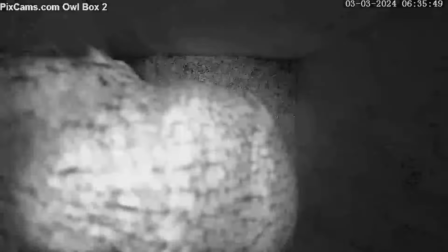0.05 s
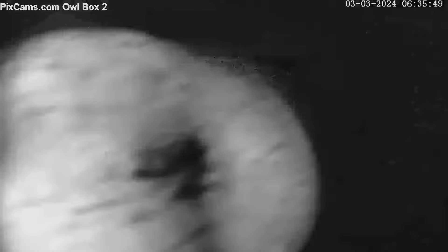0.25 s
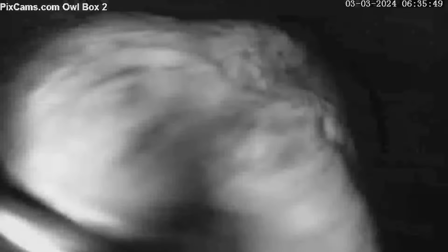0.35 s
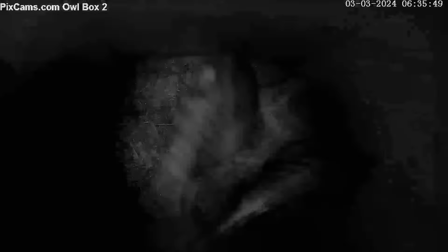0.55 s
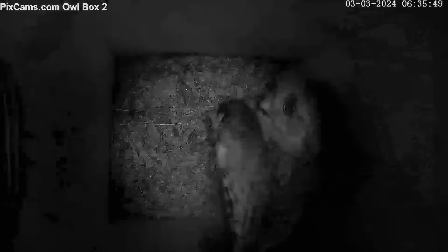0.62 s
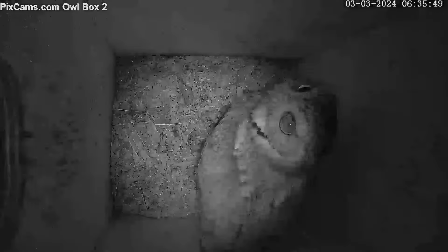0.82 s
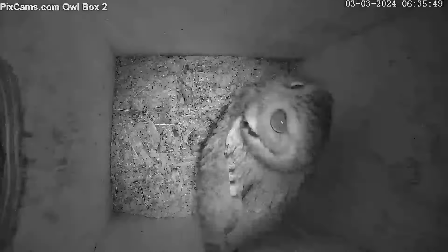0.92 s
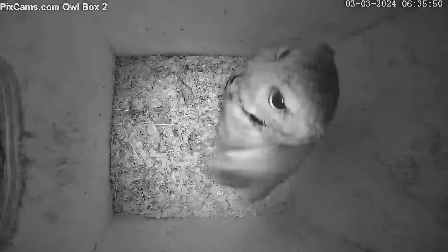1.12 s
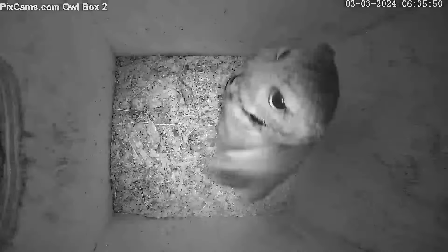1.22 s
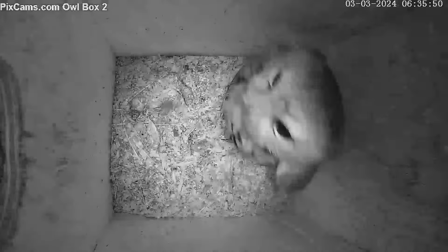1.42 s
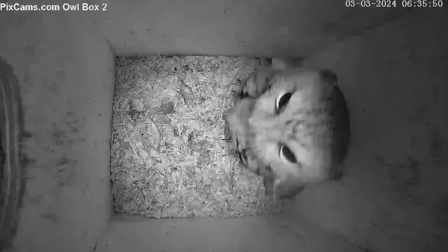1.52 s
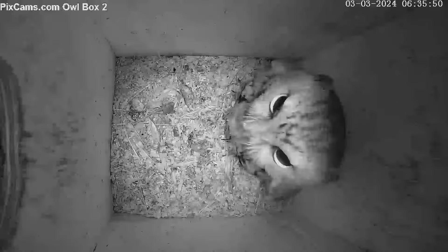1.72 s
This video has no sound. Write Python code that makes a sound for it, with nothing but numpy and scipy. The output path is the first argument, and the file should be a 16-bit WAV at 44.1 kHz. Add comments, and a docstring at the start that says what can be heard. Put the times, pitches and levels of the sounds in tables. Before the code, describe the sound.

An owl lands in a small wooden nest box with loud hollow thumps, claw knocks and scraping, then shuffles softly on shavings and makes a weaker flurry, heard close through a dull, narrow-band microphone with faint hiss.

```python
"""An owl drops into a wooden nest box, heard by a narrow-band camera microphone inside, over steady hiss.
First a very faint thump, then to about 0.65 s body thumps, claw strikes and raking: bursts of force on box modes.
Next, quiet shuffling on wood shavings: random slips drive the modes, dry grains rustle.
From about 1.1 s a weaker flurry of blows and slides as it turns, dying away by 1.6 s."""
import sys
import numpy as np
from scipy import signal
from scipy.fft import rfft, irfft
from scipy.io import wavfile

SR = 44100
rng = np.random.default_rng(int(sys.argv[2]) if len(sys.argv) > 2 else 0)


def put_to_file(sound):
    """Save the sound as 16-bit audio at rate SR, in the file named by the first command-line argument."""
    columns = np.atleast_2d(sound).T  # one column per channel
    safe = np.clip(columns, -1, 1)
    whole_steps = np.round(safe * 32767)
    wavfile.write(sys.argv[1], SR, whole_steps.astype(np.int16))


def voltage_ratio(decibels):
    """Convert decibels (scalar or array-like) to amplitude ratios, 20 dB per decade."""
    exponent = np.asarray(decibels, float) / 20
    return 10 ** exponent


N = 77175

# panel and air modes of the box: f/Hz, relative level/dB, t60/s (raised to 0.01 s if shorter)
BOX_MODES = [(80.2, -7.5, 0.2), (98.5, -12.5, 0.45), (124, 3, 0.11), (154.1, -2, 0.11), (206.25, 1, 0.24),
             (267.2, 3.5, 0.046), (322.5, -3, 0.049), (397.6, 0, 0.097), (450, -7, 0.11), (558, -14, 0.027),
             (723.4, -3.5, 0.084), (783, 1.5, .06), (1213, -11, 0.052), (1531.4, -5, 0.012),
             (1671, -12.5, 0.042), (1832, -8.5, 0.021), (2540, -9.5, 0.016), (3115, -13, 0.015),
             (3550, -13, 0.0067)]
SWELL_CYCLES = 0.6  # time constant of each mode's swell

# circuit hiss spectrum: f/Hz, relative density/dB
HISS_COLOUR = [(24, -36), (40, -1.5), (547, -6.5), (616, -5), (895, -9), (1650, -9), (2910, -11),
               (3480, -4), (4400, -20), (5720, -84), (9680, -120)]
HISS_RMS_DB = -67.5  # ahead of the band limit

# weight shifting on the floor board: t/s, force level/dB
LEAN = [(.18, -60.5), (.21, -19), (.3, -29), (0.401, -14), (0.502, -7), (.61, -47.5), (.67, -24.5),
        (.74, -27.5), (.79, -32), (.9, -44), (0.979, -48.5), (1.101, -27.5), (1.161, -32), (1.3, -39),
        (1.47, -44.5), (1.5, -68)]
LEAN_HZ, LEAN_OCTAVES = 107, 0.66

# feathers and shavings rustling: t/s, dry level/dB
RUSTLE = [(.2, -74), (0.237, -57), (.248, -41.5), (0.273, -50), (.3, -37), (0.362, -36.5), (0.388, -30),
          (0.426, -31.5), (0.427, -44.5), (0.438, -27), (.465, -21), (.5, -36), (0.521, -49.5), (.53, -34),
          (.57, -46.5), (.6, -57.5), (0.638, -52), (0.738, -65), (.79, -52), (0.851, -48.5), (.9, -54),
          (.965, -60), (.99, -56), (1.04, -55.5), (1.106, -39.5), (1.152, -48.5), (1.187, -62.5),
          (1.226, -56.5), (1.28, -61.5), (1.31, -53.5), (1.37, -66.5), (1.41, -56.5), (1.48, -70.5),
          (1.53, -63), (1.6, -86)]
# gentle contact spectrum: f/Hz, relative density/dB
GENTLE_COLOUR = [(500, -44.5), (900, -21), (1150, -12), (1400, -20), (2000, -8.5), (2560, -9), (3000, -12),
                 (3500, -17), (4000, -23.5), (6000, -42)]
# hard contact (scrape) spectrum: f/Hz, relative density/dB
SCRAPE_COLOUR = [(400, -32), (800, -6), (1500, -3), (2300, -6.5), (3000, -8.5), (3700, -8), (4400, -9),
                 (6000, -30)]
GRAINS_PER_S, GRAIN_SPREAD_DB, RUSTLE_RING_DB = 10000, 4.5, 1
HARD_FROM_DB, HARD_SPAN_DB = -48.5, 14  # rustle level at which scrape sets in; range of the crossfade

# body pressing and sliding on the boards: t/s, force level/dB, centre f/Hz, breadth/octaves (0.1 at least)
SLIDE = [(.17, -51, 420, 0.15), (.2, -22, 416.4, 0.33), (.235, -16.5, 250, .8), (.27, 1.5, 160, .8),
         (.36, -9, 300, 0.92), (0.411, 0.5, 300, .9), (0.451, -8.5, 200, 1.12), (.49, -14, 200, 1.5),
         (.51, -30, 153, 1.6), (0.569, -23.5, 171, 0.75), (.6, -18.5, 123, .7), (0.702, -31, 304, 0.87),
         (0.779, -40.5, 302, 0.68), (0.824, -16.5, 430, 0.1), (.87, -36, 430, 0.46),
         (0.919, -23.5, 410, 0.067), (.97, -40.5, 400, 0.18), (1.038, -20, 398, .2), (1.07, -32, 450, 1.1),
         (1.11, -18.5, 750, 0.5), (1.149, -35, 715, .6), (1.19, -25.5, 192, 0.86), (1.25, -21.5, 250, 1.43),
         (1.29, -24, 203, 0.88), (1.348, -26.5, 400, 1.62), (1.371, -38.5, 212.4, 1.6),
         (1.421, -21.5, 225.3, 1.13), (1.455, -40, 166.7, 2.2), (1.483, -32.5, 150, 0.58),
         (1.53, -41, 790, 0.1), (1.566, -46.5, 790, 0.41), (1.6, -75.5, 790, 0.17)]
SLIPS_PER_S, SLIP_SPREAD_DB = 3000, 2

# claws striking and raking the wood: t/s, peak level/dB, centre f/Hz, length/s, breadth/octaves (0.1 at least)
CLAWS = [(0.219, -21.5, 913, 0.0099, 0.53), (0.257, -27, 1600, 0.0097, .4),
         (.279, -17, 1595, 0.0034, 0.096), (0.299, -4.5, 1410, 0.0037, .5), (0.324, -3, 1100, .005, .9),
         (0.33, -8, 1500, .007, 0.89), (0.372, -17.5, 1318, 0.0024, .6), (0.397, -10.5, 2300, .005, .6),
         (.407, -3, 2000, .01, 0.88), (0.421, -22, 1485, 0.0065, 1.2), (0.43, -17, 1500, 0.021, 3.6),
         (0.509, -18, 2950, 0.0087, 1), (.525, -13, 1210, 0.012, .9), (0.544, -3.5, 1190, .006, .35),
         (0.544, -9, 3320, .005, 0.34), (0.56, -16.5, 872, 0.0077, 1.4), (0.618, -23.5, 1200, 0.0055, 0.76),
         (.63, -20, 1200, 0.0049, 1.3), (1.094, -58, 735, .008, 0.17), (1.132, -39, 776, 0.0064, .2),
         (1.215, -32.5, 1200, 0.0096, 1.03), (1.3, -42.5, 2100, 0.0076, .3), (1.4, -45, 2000, 0.018, .3),
         (1.503, -26, 725, .006, 0.33), (1.504, -32.5, 1650, 0.0074, 0.3),
         (1.502, -33.5, 3550, 0.0074, 0.16)]
CLAW_ROUGH, CLAW_DRY_DB, CLAW_DAMPING_DB_PER_S = 0.84, -11, 202

# body blows on the boards: t/s, peak level/dB, centre f/Hz, length/s, damping by the leaning body/(dB/s)
THUMPS = [(0.0, -48, 137.4, 0.0074, 302), (.24, -12.5, 200, 0.0065, 303), (.246, -4, 270, 0.0084, 196.5),
          (.262, -17, 200, 0.013, 190), (.298, -10, 260, .008, 288.5), (.328, -7, 260, .006, 300),
          (.334, -9.5, 260, 0.0078, 190.5), (.423, -15, 200, .006, 599), (.462, -4, 120, 0.0052, 311),
          (.516, -5.5, 160, 0.0027, 499), (.529, -6, 200, 0.0071, 804.5), (.555, -12, 133, 0.0033, 300),
          (.629, -1.5, 239, 0.011, 50.5), (1.197, -26.5, 120, 0.0017, 603.5), (1.221, -22, 220, 0.015, 404),
          (1.243, -20, 132.5, 0.031, 405), (1.264, -33, 250, .006, 602), (1.4, -24, 124, 0.0043, 497),
          (1.412, -27, 250, 0.0025, 502), (1.432, -32.5, 160, 0.03, 898.5),
          (1.518, -45.5, 190, 0.024, 396.5), (1.555, -45, 190, 0.0087, 397)]
THUMP_ROUGH, THUMP_DRY_DB, THUMP_OCTAVES = 0.37, -8.5, 0.63
SPOT_DB = 2.0  # random spread of each mode's level from blow to blow

BASS_CUT_HZ, EDGE_HZ, EDGE_WIDTH_HZ = 80, 3680, 1400
FULL_SCALE = 0.79
DITHER_RMS_DB = -103


def evened(x):
    """Scales x to unit rms."""
    return x / np.sqrt(np.mean(x ** 2) + 1e-20)


def add(mix, start_s, sound):
    """Adds sound into mix at start_s, cut at the end of mix."""
    part = mix[max(round(start_s * SR), 0):][:len(sound)]
    part += sound[:len(part)]


def level_curve_db(time_s, level_db):
    """Level per sample from a table of points, -120 dB outside them."""
    return np.interp(np.arange(N) / SR, time_s, level_db, -120, -120)


def coloured(x, points):
    """Filters x by a spectrum drawn on a log-frequency axis."""
    f, db = np.transpose(points)
    hz = np.fft.rfftfreq(len(x), 1 / SR)
    gain_db = np.interp(np.log(hz + 1), np.log(f + 1), db)
    return irfft(rfft(x) * voltage_ratio(gain_db), len(x))


def clicks(per_s, spread_db):
    """Random clicks of either sign at unit rms overall; a few are large."""
    hit, size, sign = rng.random((N, 3)).T
    height = voltage_ratio(-spread_db * np.log(size + 0.0038))
    return evened((hit < per_s / SR) * height * np.sign(sign - 0.5))


def modes(seconds=0.3):
    """One dying sine per box mode, swelling softly over its first cycle or two."""
    t = np.arange(round(seconds * SR)) / SR
    hz, db, t60_s = np.transpose(BOX_MODES)[:, :, None]
    t60_s = np.maximum(t60_s, 0.01)
    swell = (1 - np.exp(-t * hz / SWELL_CYCLES)) ** 2
    decay = voltage_ratio(db - 60 * t / t60_s)
    return swell * decay * np.sin(2 * np.pi * hz * t) / np.sqrt(t60_s * SR)


def reach(centre_hz, octaves):
    """Gaussian drive of each mode by a contact at centre_hz; octaves is its standard deviation."""
    distance_octaves = np.log2(np.array(BOX_MODES)[:, :1] / centre_hz)
    return np.exp(-0.5 * (distance_octaves / octaves) ** 2)


def hiss():
    """Circuit noise: white noise shaped to the hiss spectrum."""
    return voltage_ratio(HISS_RMS_DB) * evened(coloured(rng.standard_normal(N), HISS_COLOUR))


def lean():
    """Small slips under the feet stir mainly the lowest panels."""
    force = clicks(SLIPS_PER_S, SLIP_SPREAD_DB) * voltage_ratio(level_curve_db(*np.transpose(LEAN)))
    ring = (reach(LEAN_HZ, LEAN_OCTAVES) * modes()).sum(0)
    return signal.fftconvolve(force, ring)[:N]


def rustle():
    """Dense grains, heard dry and through the box; hard contact turns the rustle into a wide scrape."""
    level_db = level_curve_db(*np.transpose(RUSTLE))
    hard = np.clip((level_db - HARD_FROM_DB) / HARD_SPAN_DB, 0, 1)
    grains = clicks(GRAINS_PER_S, GRAIN_SPREAD_DB)
    gentle = evened(coloured(grains, GENTLE_COLOUR))
    scrape = evened(coloured(grains, SCRAPE_COLOUR))
    direct = ((1 - hard) * gentle + hard * scrape) * voltage_ratio(level_db)
    return direct + voltage_ratio(RUSTLE_RING_DB) * signal.fftconvolve(direct, modes().sum(0))[:N]


def slide():
    """Uneven slips of the body; the place of contact wanders, and with it the modes that sound."""
    time_s, level_db, centre_hz, octaves = np.transpose(SLIDE)
    t = np.arange(N) / SR
    centre_hz = np.exp(np.interp(t, time_s, np.log(centre_hz)))
    share = reach(centre_hz, np.maximum(np.interp(t, time_s, octaves), 0.1))
    force = clicks(SLIPS_PER_S, SLIP_SPREAD_DB) * voltage_ratio(level_curve_db(time_s, level_db))
    return signal.fftconvolve(force * share, modes(), axes=1).sum(0)[:N]


def blow(peak_db, centre_hz, length_s, octaves, damping_db_per_s, rough, dry_db):
    """A first hit and a short chatter of force: rings modes near its centre and is also heard dry."""
    ring = modes()
    t = np.arange(ring.shape[1]) / SR
    u = np.arange(2048) / SR / max(length_s, 0.001)
    chatter = rng.standard_normal(2048) * np.sin(np.pi * np.minimum(u, 1) ** 0.67)
    force = rough * chatter / np.sqrt(length_s * SR)
    force[0] += 1 - min(rough, 1)  # the first hit

    spot = voltage_ratio(SPOT_DB * rng.standard_normal((len(BOX_MODES), 1)))
    body = (reach(centre_hz, octaves) * spot * ring).sum(0) * voltage_ratio(-abs(damping_db_per_s) * t)
    edges_hz = centre_hz * 2.0 ** np.array([-octaves, octaves])
    band = signal.butter(3, edges_hz, "band", fs=SR, output="sos")
    direct = signal.sosfilt(band, 1.0 * (t == 0))
    sound = signal.fftconvolve(force, evened(body) + voltage_ratio(dry_db) * evened(direct))
    return voltage_ratio(peak_db) * sound / abs(sound).max()


def claws():
    """Hard claw strikes: mostly chatter, all with the same damping."""
    out = np.zeros(N)
    for start_s, peak_db, hz, length_s, octaves in CLAWS:
        add(out, start_s, blow(peak_db, hz, length_s, max(octaves, 0.1),
                               CLAW_DAMPING_DB_PER_S, CLAW_ROUGH, CLAW_DRY_DB))
    return out


def thumps():
    """Soft body blows: less chatter, ringing damped by the leaning body."""
    out = np.zeros(N)
    for start_s, peak_db, hz, length_s, damping_db_per_s in THUMPS:
        add(out, start_s, blow(peak_db, hz, length_s, THUMP_OCTAVES,
                               damping_db_per_s, THUMP_ROUGH, THUMP_DRY_DB))
    return out


def scene():
    """Thumps, claws, sliding, shifting weight and rustle, as one channel."""
    return (thumps() + claws() + slide() + lean() + rustle())[None]


def top_cut(x):
    """Nothing passes above the cut-off."""
    return signal.sosfilt(signal.butter(12, 4890, fs=SR, output="sos"), x)


def record(dry):
    """Camera microphone: thin bass, circuit hiss, narrow band, hard ceiling, faint white noise."""
    bass_cut = signal.butter(4, BASS_CUT_HZ, "high", fs=SR, output="sos")
    x = signal.sosfilt(bass_cut, dry) + hiss()
    hz = np.fft.rfftfreq(N, 1 / SR)
    loss_db = 20 * np.maximum((hz - EDGE_HZ) / EDGE_WIDTH_HZ + 0.5, 0) ** 3
    x = irfft(rfft(x) * voltage_ratio(-np.minimum(loss_db, 70)), N)
    x = np.clip(x, -FULL_SCALE, FULL_SCALE)
    mix = x + voltage_ratio(DITHER_RMS_DB) * rng.standard_normal(N)
    return top_cut(mix)


dry = scene()
out = record(dry)
put_to_file(out)
```